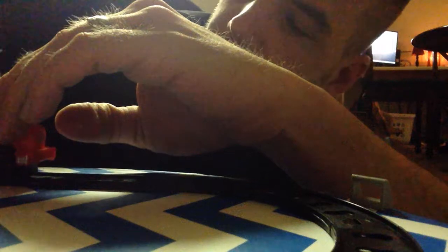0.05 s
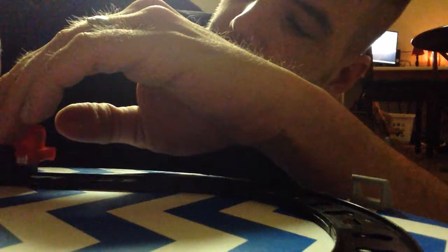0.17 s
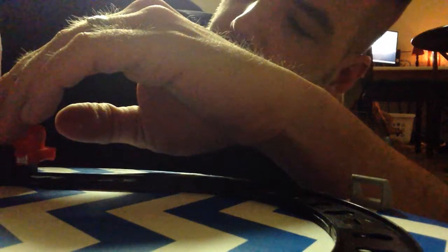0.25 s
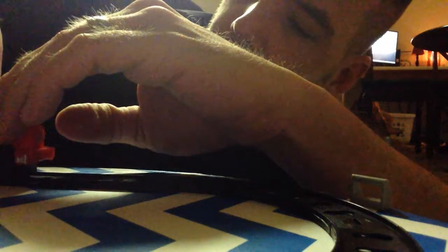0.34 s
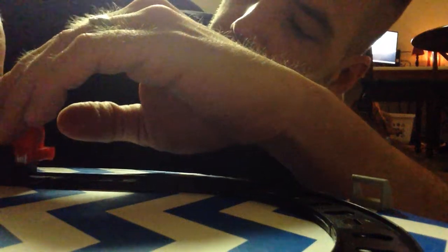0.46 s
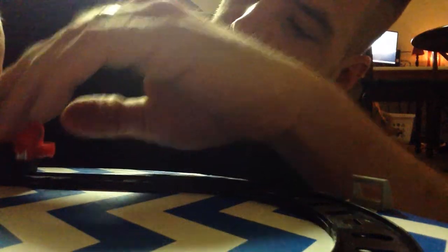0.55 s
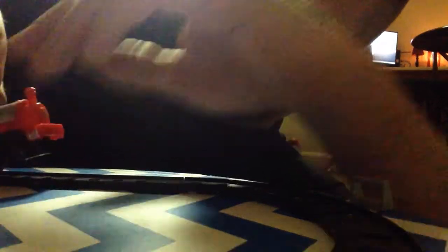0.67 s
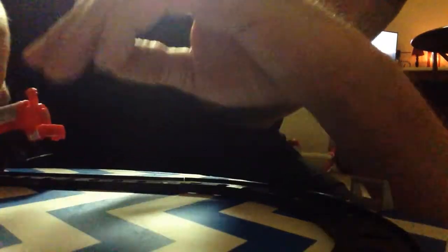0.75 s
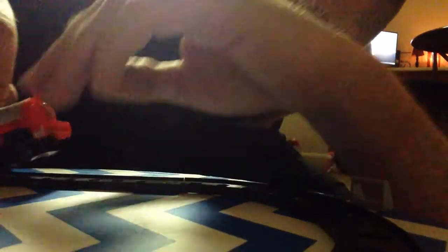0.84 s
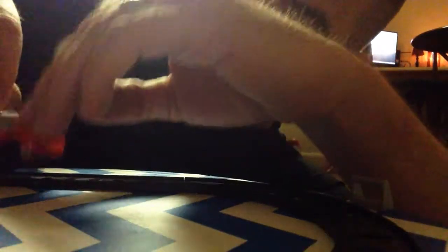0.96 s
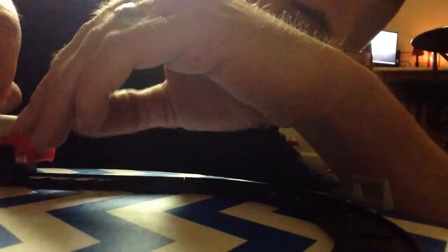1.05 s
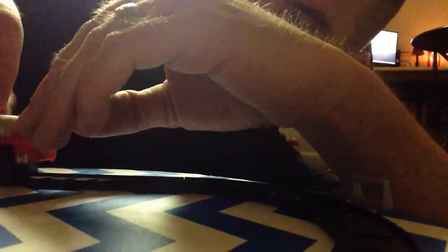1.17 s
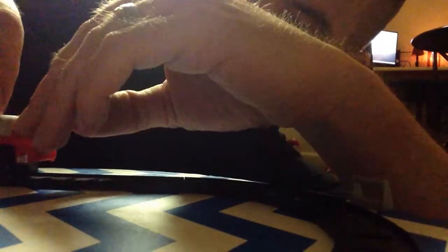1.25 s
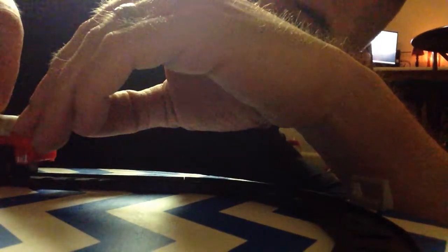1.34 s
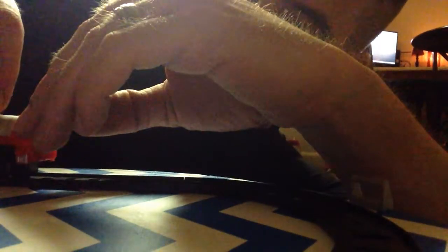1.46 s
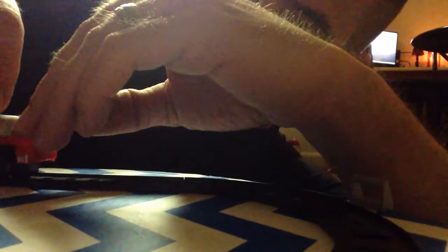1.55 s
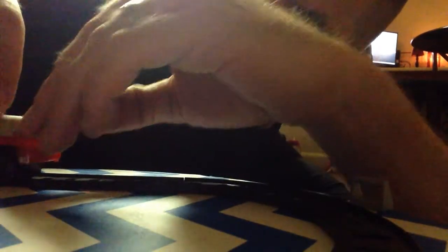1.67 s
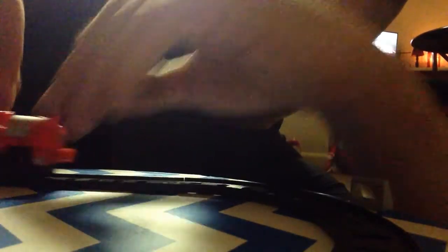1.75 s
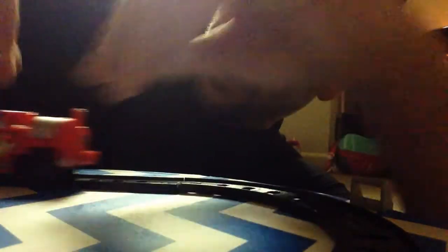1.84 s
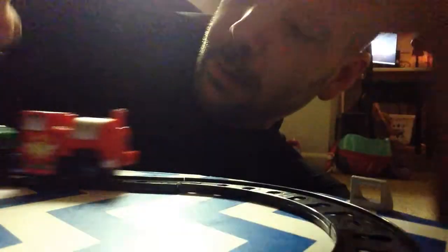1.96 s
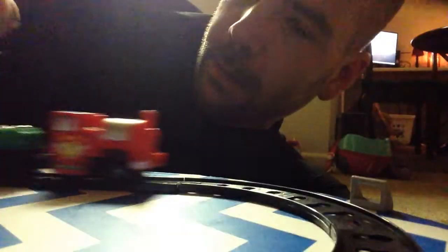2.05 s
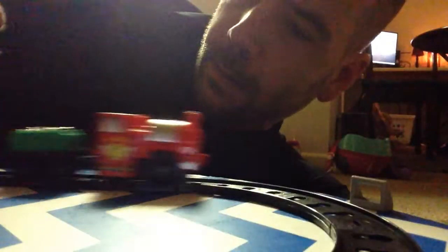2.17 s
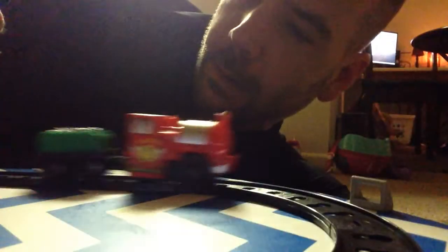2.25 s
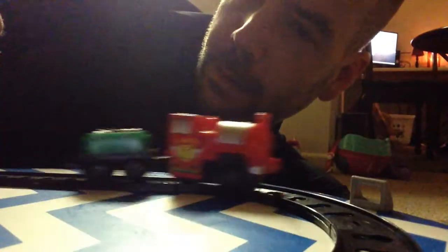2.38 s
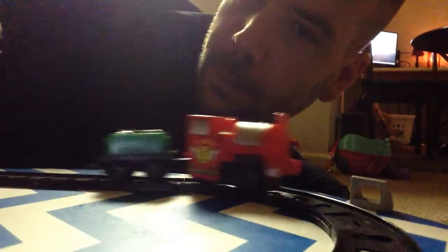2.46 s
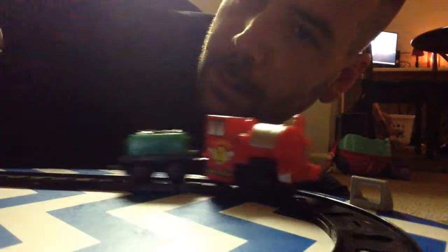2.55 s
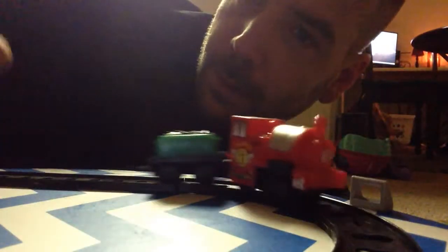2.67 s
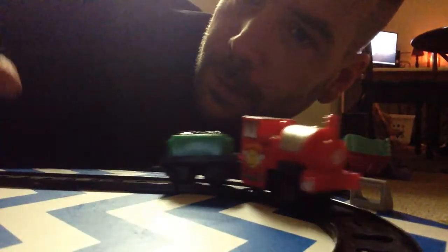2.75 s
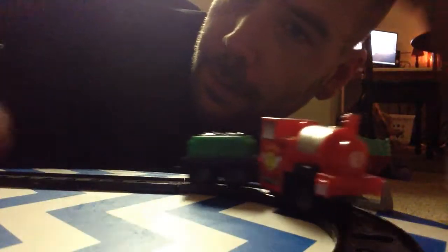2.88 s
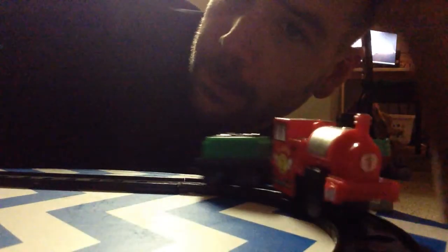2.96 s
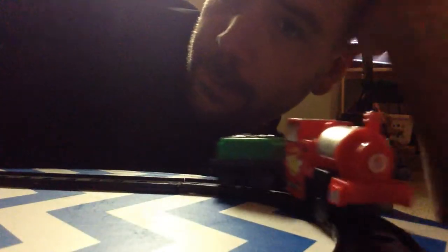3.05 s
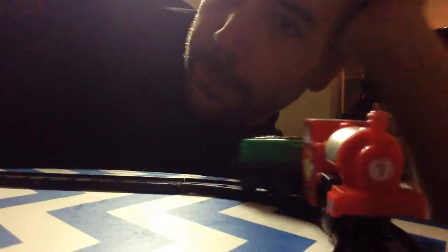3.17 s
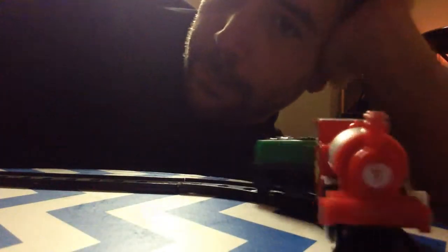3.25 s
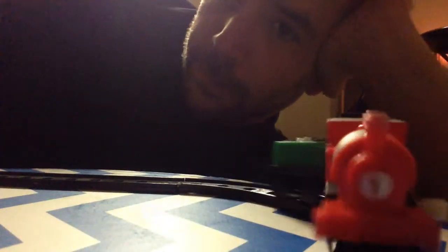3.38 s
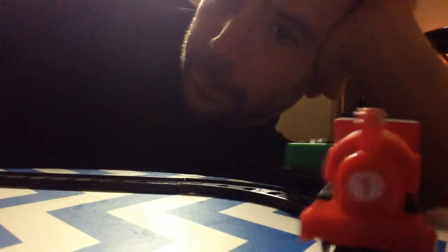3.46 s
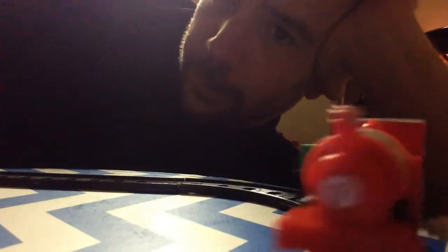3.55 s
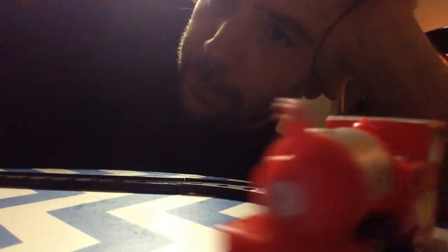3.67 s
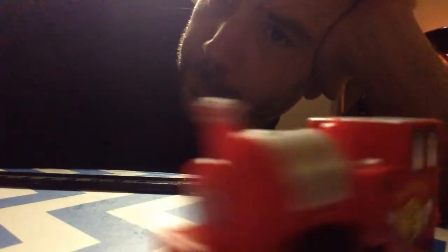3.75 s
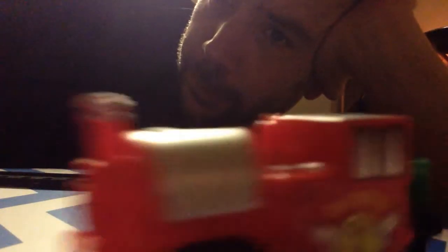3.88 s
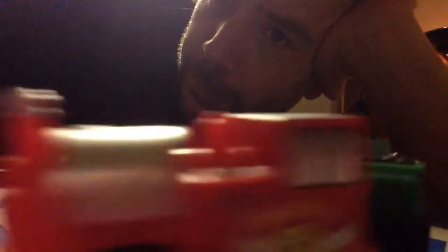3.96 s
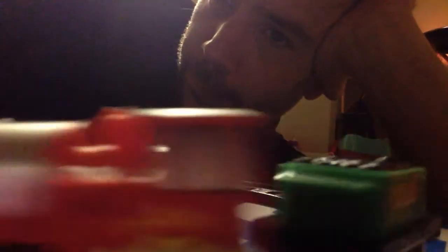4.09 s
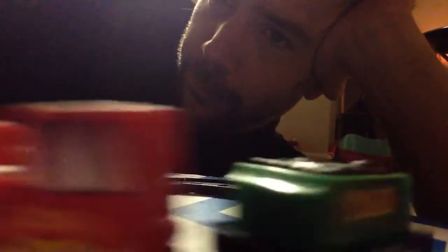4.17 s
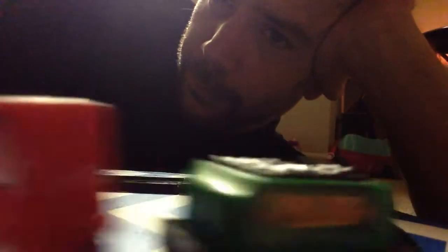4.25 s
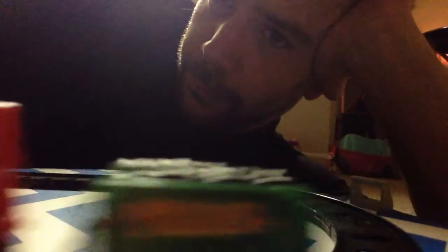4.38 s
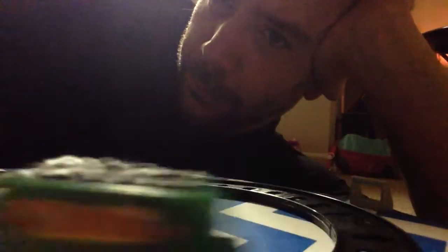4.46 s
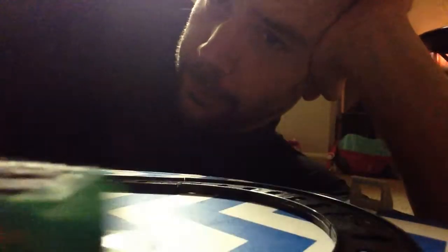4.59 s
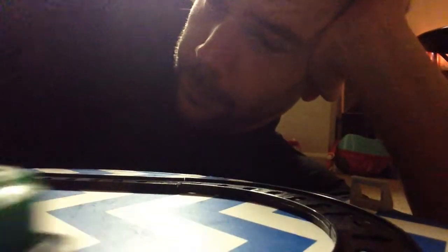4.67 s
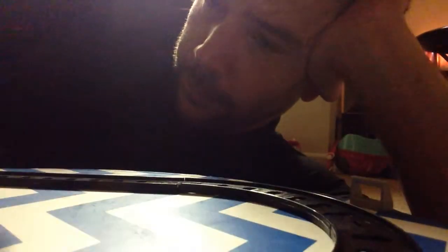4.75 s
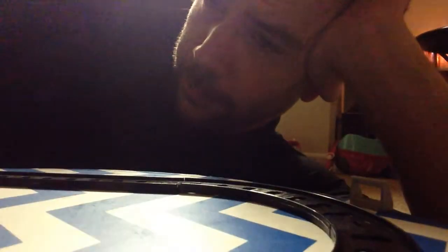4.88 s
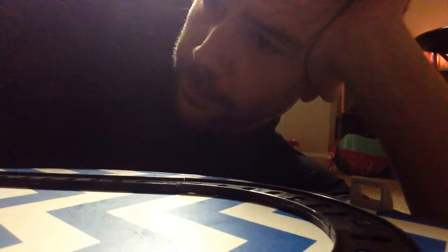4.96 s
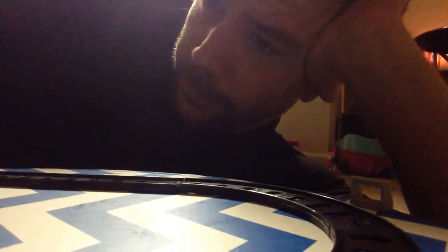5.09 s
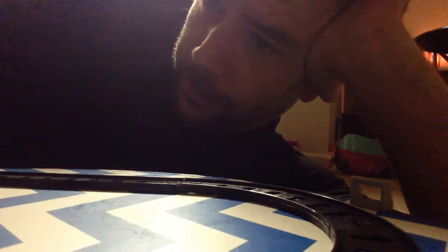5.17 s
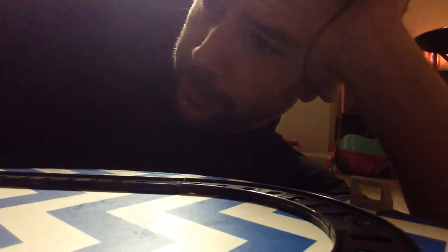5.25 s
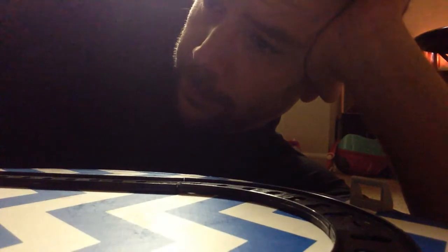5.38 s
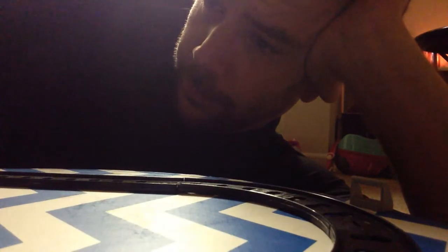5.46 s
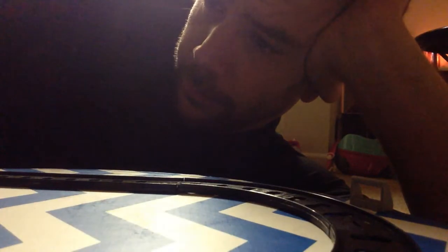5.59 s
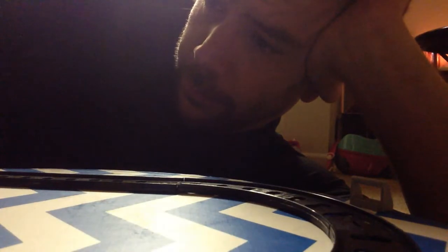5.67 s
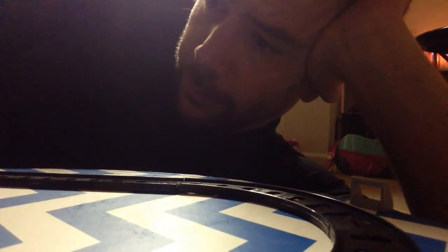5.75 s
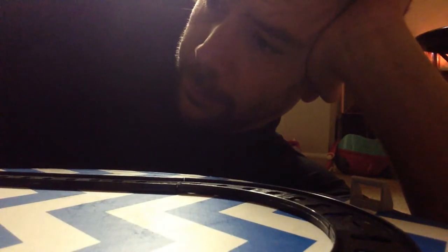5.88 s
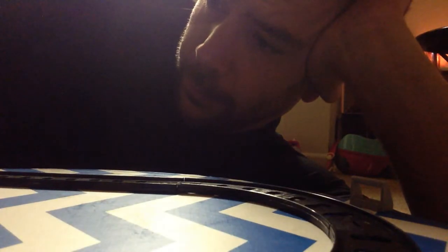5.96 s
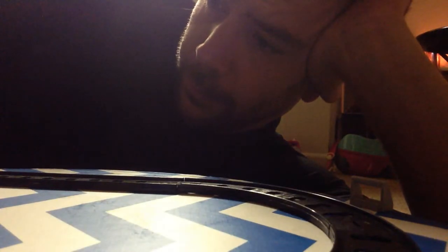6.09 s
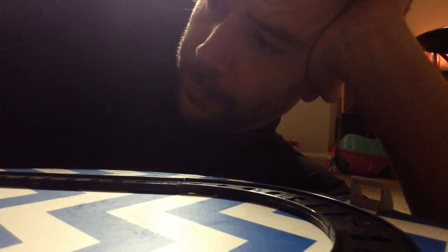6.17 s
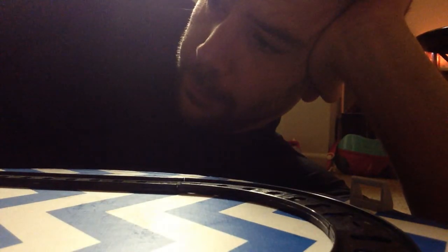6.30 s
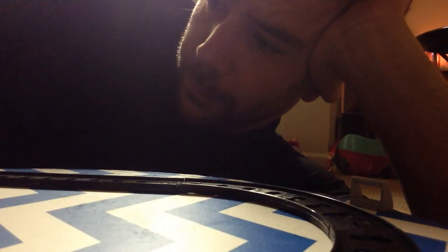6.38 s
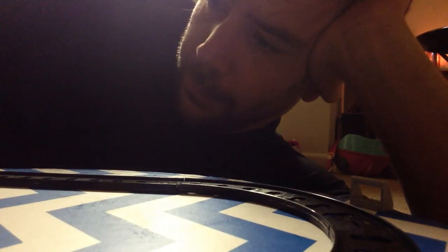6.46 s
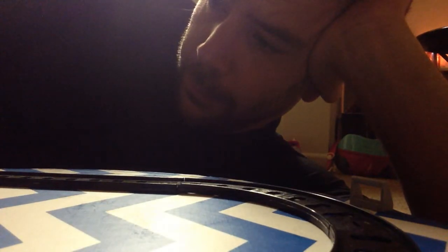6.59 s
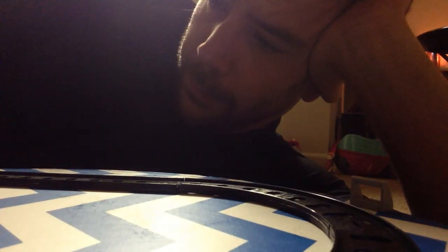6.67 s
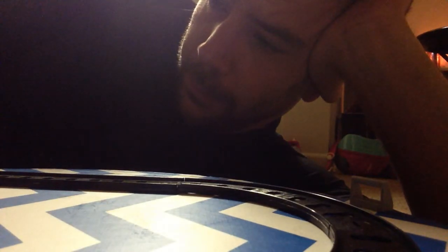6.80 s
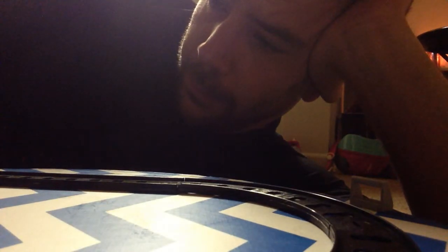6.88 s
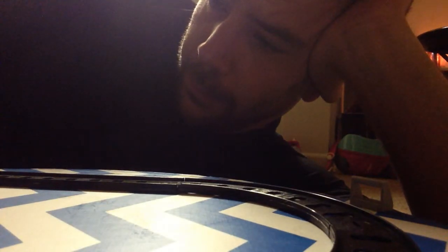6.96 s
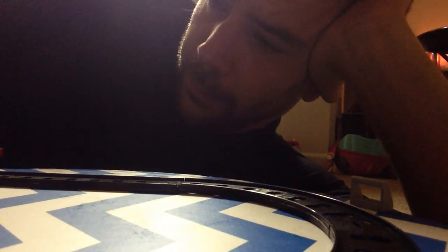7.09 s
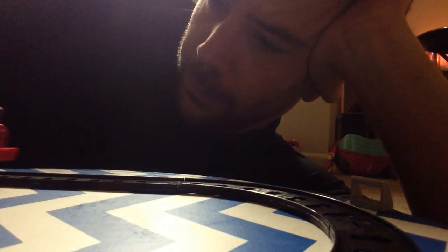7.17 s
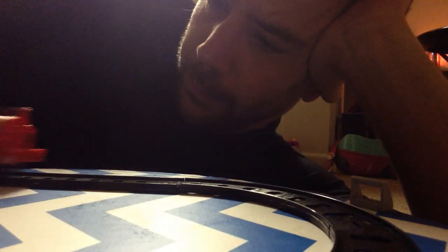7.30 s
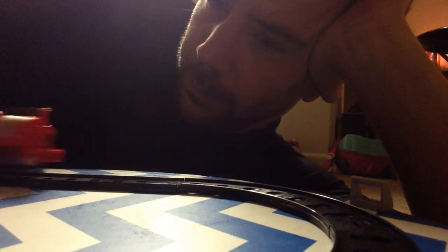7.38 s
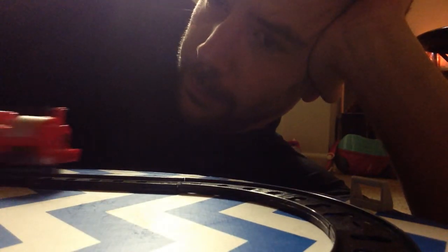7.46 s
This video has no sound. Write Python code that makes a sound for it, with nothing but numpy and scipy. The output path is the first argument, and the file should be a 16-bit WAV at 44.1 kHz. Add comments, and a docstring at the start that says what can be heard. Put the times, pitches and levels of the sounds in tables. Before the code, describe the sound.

Plastic clicks and stuttering motor bursts, then a buzzy toy train clatters one lap over a tabletop, knocking across track joints.

```python
"""Toy train lap on a tabletop track

A battery toy train on a plastic track laid on a table, heard from the edge of the track in a small room.
Fingers fumble the switch and the motor runs in short spurts; then the train does one lap, passing close by.
Bunched random tooth contacts rattle in a hollow shell whose colour changes as the train moves. Wheel taps
drum on the table and track, joints knock and boom, and loose pieces of track ring as resonances."""
import sys
import numpy as np
from scipy import signal
from scipy.fft import rfft, irfft
from scipy.io import wavfile

SR = 44100
rng = np.random.default_rng(int(sys.argv[2]) if len(sys.argv) > 2 else 0)


def wrap_up_sound(samples):
    """Save the sound to the file named by the first command line argument, as 16-bit audio."""
    columns = np.atleast_2d(samples).T
    # keep every value between -1 and 1, then stretch to whole-number steps
    tamed = np.clip(columns, -1, 1)
    steps = np.round(tamed * 32767).astype(np.int16)
    wavfile.write(sys.argv[1], SR, steps)


N = 332073
TIME = np.arange(N) / SR
START_S = 1.767   # the lap begins

# Spectrum of a wheel knock. Each row: frequency in Hz, level in dB per Hz.
KNOCK_SPECTRUM = [(20, -61), (50, -32), (100, -2.5), (170, 8), (260, 0), (400, -2), (550, -4), (900, -17.5),
                  (1600, -17), (4000, -55)]
# Spectrum of a plastic click or rub. Each row: frequency in Hz, level in dB per Hz.
CLICK_SPECTRUM = [(300, -13), (900, -2), (1600, -16.5), (2600, -4), (4000, -2), (7000, -10), (15000, -26.5)]
# Engine on the track, with the bass damped by the hand. Each row: frequency in Hz, level in dB per Hz.
SET_DOWN_SPECTRUM = [(20, -48.5), (50, -16), (100, -7), (170, 4), (280, 5), (400, -8), (550, -12),
                     (900, -17), (1600, -33), (4000, -46)]


def from_db(db):
    """Amplitude ratio of a level in dB."""
    return 10 ** (np.asarray(db) / 20)


def rms_one(x):
    """The signal scaled to an rms of 1."""
    return x / np.sqrt(np.mean(x ** 2) + 1e-20)


def in_time(rows):
    """The columns of a curve table at every sample."""
    s, *columns = np.transpose(rows)
    return [np.interp(TIME, s, column) for column in columns]


def drift(hz):
    """Smooth chance with rms 1: noise lowpassed at this frequency."""
    lowpass = signal.butter(2, hz, fs=SR, output="sos")
    slow = signal.sosfilt(lowpass, rng.standard_normal(N + SR))
    return rms_one(slow[SR:])   # leave out the filter's first second


def response(colour, size=4096):
    """The causal (minimum-phase) impulse response of a body with this spectrum; peak 1."""
    hz, db = np.transpose(colour)
    grid = np.maximum(np.arange(size // 2 + 1) * SR / size, 1)
    level_db = np.interp(np.log(grid), np.log(hz), db)
    # folding the cepstrum onto positive time gives minimum phase
    cepstrum = irfft(np.log(from_db(level_db)))
    cepstrum[1:size // 2] *= 2
    cepstrum[size // 2 + 1:] = 0
    h = irfft(np.exp(rfft(cepstrum)))
    return h / np.abs(h).max()


def through(x, h):
    """A sound passed through an impulse response, kept to its own length."""
    return signal.oaconvolve(x, h)[:len(x)]


def add(out, s, sound):
    """Mixes a short sound in at time s."""
    at = int(s * SR)
    out[at:at + len(sound)] += sound[:N - at]


def impacts(chance, spread_db):
    """Contacts of either sign and the given strength spread, with the given chance at each sample."""
    size = from_db(spread_db * np.clip(rng.standard_normal(N), -2, 2))
    return (rng.random(N) < chance) * size * rng.choice([-1, 1], N)


def ringing(t60, ring_db, size=4096):
    """A sharp contact followed by decaying noise, like the dense, dying modes of a hollow part."""
    h = rng.standard_normal(size) * from_db(-60 * np.arange(size) / SR / t60)
    h *= from_db(ring_db) / np.linalg.norm(h)
    h[0] = 1
    return h


def strike(clicks, t60, ring_db):
    """Each sharp contact is followed by a dense noisy ring that dies away and is never twice the same."""
    keep = from_db(-120 / (t60 * SR))   # energy kept from sample to sample
    energy = signal.lfilter([1 - keep], [1, -keep], clicks ** 2 + 1e-18)
    return clicks + from_db(ring_db) * np.sqrt(energy) * rng.standard_normal(N)


def blows(events, colour, t60, ring_db):
    """Single blows (time in seconds, peak in dB) on a body, each with its own ring."""
    out = np.zeros(N)
    for s, db in events:
        hit = through(ringing(t60, ring_db), response(colour))
        add(out, s, from_db(db) * hit / np.abs(hit).max())
    return out


def mode(x, hz, t60):
    """One resonance: a two-pole filter that rings down by 60 dB in t60 seconds."""
    r = from_db(-60 / (t60 * SR))
    w = 2 * np.pi * hz / SR
    return signal.lfilter([1, 0, -1], [1, -2 * r * np.cos(w), r * r], x)


def resonate(clicks, modes, wander_db, wander_hz):
    """Modes driven by the contacts; each swells and fades as the point of contact moves."""
    out = 0
    for hz, db, t60 in modes:
        drive = clicks * rng.standard_normal(N) * from_db(wander_db * drift(wander_hz))
        out = out + from_db(db) * rms_one(mode(drive, hz, t60))
    return rms_one(out)


def travelling(x, colours, times):
    """A sound whose colour passes from one spectrum to the next as the train moves."""
    out = 0
    for row, colour in zip(np.eye(len(colours)), colours):
        share = np.interp(TIME, times, row)
        out = out + share * rms_one(through(x, response(colour)))
    return out


def quiet_room():
    """The steady hush of the quiet room: noise shaped by a fixed spectrum."""
    # Spectrum of the quiet room. Each row: frequency in Hz, level in dB per Hz.
    hush = [(15, -48.5), (25, -18), (38, -8.5), (71, -4.5), (106, 2), (146, -6), (264, -11), (309, -7),
            (404, -12.5), (501, -7.5), (790, -10.5), (1120, -20.5), (1280, -18), (1390, -25), (1760, -27),
            (1910, -21.5), (2240, -33), (2500, -30), (4870, -36.5), (5280, -35), (15000, -37.5)]
    return from_db(-61.5) * rms_one(through(rng.standard_normal(N), response(hush)))


def room(x, t60):
    """The diffuse tail of a small furnished room: decaying noise after a gap of 5 ms."""
    t = TIME[:SR // 2]
    tail = rng.standard_normal(len(t)) * from_db(-60 * t / t60) * (t > .005)
    return through(x, tail / np.linalg.norm(tail))


def hand_bumps():
    """The hand bumps the table softly: short low thuds."""
    # Soft bumps of the hand. Each row: start in seconds, peak in dB.
    bumps = [(.426, -49), (.4405, -34.5), (.511, -51), (.614, -45), (1.268, -46)]
    # Spectrum of the bumped table. Each row: frequency in Hz, level in dB per Hz.
    bump_spectrum = [(20, -46), (40, -25), (90, 0), (150, -1.5), (300, -5.5), (500, -28.5), (1200, -40),
                     (3000, -68)]
    return blows(bumps, bump_spectrum, t60=0.039, ring_db=0)


def fingers():
    """Fingers rub the plastic shell: skin slips over it in fine grains."""
    # Strokes of the fingers. Each row: centre in seconds, level in dB, half width in seconds.
    rubs = [(.553, -71, 0.0026), (.595, -77, 0.041), (.623, -65, 0.0083), (0.663, -50, 0.0028),
            (1.724, -66, 0.0046), (1.742, -63, 0.0029), (1.756, -55.5, 0.0075)]
    pressure = sum(from_db(db) * np.exp(-.5 * ((TIME - s) / width) ** 2) for s, db, width in rubs)
    grains = strike(impacts(1500 / SR, spread_db=3.0), t60=.008, ring_db=-3.0)
    return pressure * rms_one(through(grains, response(CLICK_SPECTRUM)))


def plastic_clicks():
    """The switch and the plastic wheels on the rails click: sharp contacts with a short ring."""
    # Clicks of switch and wheels. Each row: start in seconds, peak in dB.
    click_events = [(0.618, -45), (0.7067, -10), (0.7195, -20), (0.7378, -12.5), (0.876, -38),
                    (0.9465, -16), (0.958, -28), (0.983, -26), (0.9925, -34), (1.0003, -20.5),
                    (1.0243, -29), (1.0795, -23.5), (1.216, -23.5), (1.7714, -30), (1.7805, -27),
                    (1.829, -26), (2.0055, -14.5), (2.858, -19.5), (3.431, -15), (3.827, -10), (4.363, -15),
                    (4.571, -17), (4.654, -28), (4.708, -18.5), (4.796, -15), (4.873, -25), (4.946, -19),
                    (4.964, -20), (5.031, -19), (5.284, -23), (5.486, -27), (5.548, -32), (5.725, -27),
                    (5.736, -30), (6.121, -26), (6.201, -33), (6.558, -27)]
    return blows(click_events, CLICK_SPECTRUM, t60=0.018, ring_db=7)


def spurt(s, rise, hold, fall):
    """Gain of one spurt: it rises by 20 dB in the rise time, holds, then falls 20 dB per fall time."""
    before = np.maximum(s - TIME, 0) / rise
    after = np.maximum(TIME - s - hold, 0) / fall
    return from_db(-20 * np.minimum(before ** 2 + after, 10))


def wheel_load(turns, swell_db, strongest_at, waver_db):
    """Level change in dB as the load swells once a wheel turn and wavers by chance."""
    return swell_db * np.cos(2 * np.pi * (turns - strongest_at)) + waver_db * drift(14.5)


def stutters():
    """Level change in dB as the gears briefly lose contact at random moments."""
    per_s, depth_db, length_s = 14, -4.5, 0.01
    moments = rng.random(N) < per_s / SR
    dips = through(moments * 1.0, np.hanning(int(length_s * SR)))
    return depth_db * np.minimum(dips, 1)


def slack():
    """Level change in dB as the gears run free, or catch hard and rattle louder for a moment."""
    # Gears going slack. Each row: centre in seconds, level change in dB, length in seconds.
    slacks = [(1.797, -7.5, 0.027), (2.308, -4.5, 0.042), (2.486, -5, 0.03), (2.629, -8.5, 0.014),
              (2.672, -6.5, 0.029), (2.817, -14, 0.017), (2.843, -5.5, 0.025), (2.884, -8, 0.019),
              (3.025, -6, 0.016), (3.18, -5.5, 0.02), (3.212, -8.5, 0.023), (3.366, -5.5, 0.029),
              (3.404, -8, 0.0097), (3.458, -6.5, 0.015), (3.567, -7, 0.014), (3.59, -3.5, 0.0081),
              (3.632, -6, 0.015), (3.769, -6.5, 0.013), (3.958, -7.5, 0.0091), (4.124, -4.5, 0.029),
              (4.163, -12, 0.0093), (4.352, -8.5, 0.011), (4.392, -2.5, 0.014), (4.545, 0, 0.012),
              (4.736, -1.5, 0.029), (5.531, -14, 0.017), (5.713, -5, 0.012), (5.756, -11, 0.022),
              (5.792, -0.5, 0.042), (5.966, -9.5, 0.017), (6.173, -9, 0.025), (6.378, -8.5, 0.024),
              (6.593, -12, 0.017), (6.746, -7, 0.013), (7.008, -5, 0.036), (7.198, -11, 0.018),
              (7.434, -2, 0.038)]
    # Gears catching hard. Each row: centre in seconds, rise in dB, length in seconds.
    catches = [(2.438, 2.5, 0.02), (4.092, 0.5, 0.022), (4.183, 4, 0.021), (4.25, 0.5, 0.06),
               (4.455, 1.5, 0.05), (4.501, 1.5, 0.025), (7.162, 6.5, 0.014), (7.37, 5.5, 0.016)]
    out = np.zeros(N)
    t = TIME[:SR // 5] - TIME[SR // 10]
    for s, db, length in [*slacks, *catches]:
        add(out, s + t[0], db / (1 + (2 * t / length) ** 4))
    return out


def motor_drive():
    """Gains of gear rattle, table rumble and track clatter: the spurts, and the lap pulsing with wheel turns."""
    # Motor spurts under the fingers. Each row: time of reaching full level in seconds, rise in seconds,
    # hold in seconds, gear level in dB, wheel level in dB.
    spurts = [(0.681, 0.021, 0.012, -32.5, -32), (0.696, 0.015, 0.0056, -20.5, -26),
              (0.876, 0.005, 0.034, -50.5, -55), (0.951, 0.034, 0.0069, -24.5, -34),
              (1.029, 0.0077, 0.038, -35, -32), (1.096, 0.0083, 0.042, -28.5, -34),
              (1.124, 0.027, 0.062, -20, -46.5), (1.191, 0.009, 0.026, -29, -34)]
    # Loudness along the lap, as the train nears and leaves and the table gives under it, before slack and load.
    # Each row: time in seconds, gear level in dB, table rumble in dB, track clatter in dB.
    lap = [(1.82, -24.5, -31, -36.5), (2.4, -17, -27.5, -34.5), (2.54, -15.5, -36.5, -37),
           (2.8, -19, -32.5, -40.5), (3.15, -21.5, -38, -41.5), (3.4, -24, -36, -39.5),
           (3.62, -18.5, -34, -41.5), (3.83, -17.5, -35.5, -37), (4.05, -16.5, -33.5, -36.5),
           (4.3, -20.5, -38.5, -35.5), (4.7, -28.5, -38, -38), (5.1, -32, -34.5, -41),
           (5.65, -31.5, -35, -43.5), (6.1, -30, -36.5, -41.5), (6.65, -31.5, -40, -45),
           (6.87, -30.5, -35.5, -43), (7.1, -31.5, -33.5, -40), (7.3, -33, -41.5, -44),
           (7.53, -31.5, -31.5, -47)]
    # Rotation of the driving wheels. Each row: time in seconds, turns made.
    wheel_turns = [(1.8, 0), (2.44, 3), (3.024, 6), (4.545, 14), (5.53, 19), (7.61, 29)]
    # Load on gears, rumble and clatter. Each holds: swell in dB, strongest part of a turn, waver in dB.
    gear_load = (1, 0.4, 0.94)
    rumble_load = (0.97, 0.22, 0.19)
    clatter_load = (1, 0.48, 0.51)
    gear_fall_s, wheel_fall_s = 0.018, 0.022   # time to fall by 20 dB
    spurt_clatter_db = -4.5   # track clatter against table rumble in a spurt

    running = np.clip((TIME - START_S) / 0.012, 0, 1) ** .5   # spins up in 12 ms
    gear_db, rumble_db, clatter_db = in_time(lap)
    turns, = in_time(wheel_turns)
    slack_db = slack()
    wheel_slack_db = 0.62 * slack_db   # the share of the slack that reaches the wheels
    gear = running * from_db(gear_db + slack_db + stutters() + wheel_load(turns, *gear_load))
    rumble = running * from_db(rumble_db + wheel_slack_db + wheel_load(turns, *rumble_load))
    clatter = running * from_db(clatter_db + wheel_slack_db + wheel_load(turns, *clatter_load))
    for s, rise, hold, spurt_db, wheel_db in spurts:
        rolling = from_db(wheel_db) * spurt(s, rise, hold, wheel_fall_s)
        gear = np.maximum(gear, from_db(spurt_db) * spurt(s, rise, hold, gear_fall_s))
        rumble = np.maximum(rumble, rolling)
        clatter = np.maximum(clatter, from_db(spurt_clatter_db) * rolling)
    return gear, rumble, clatter


def gears(shake, drive, bunching=1.9, per_s=5600, shake_db=1.1, flurry_db=2.0):
    """Loose teeth hit and bounce in a bunch at each mesh, some jump with a hard tick, and the shell rings."""
    # Small rattling resonances of the shell. Each row: frequency in Hz, level in dB, t60 in seconds.
    shell_modes = [(2640, 5, 0.0034), (3760, -3, 0.0085), (4540, -5, 0.02), (6530, 1.5, 0.0092),
                   (8540, -1.5, 0.006), (10410, 4.5, 0.01), (11870, 5, 0.0047)]
    # Shell resonances while the fingers hold it. Each row: frequency in Hz, level in dB, t60 in seconds.
    held_modes = [(3650, 1, 0.012), (4300, 0.5, 0.0095), (6460, 2.5, 0.011)]
    # Parts of the shell that ring out over a stretch of the lap. Each row: centre in seconds,
    # half width in seconds, frequency in Hz, level in dB against the rattle, t60 in seconds.
    ring_outs = [(3.55, 0.46, 3620, -20.5, 0.02), (3.7, 0.3, 3850, -16, 0.02),
                 (3.78, 0.18, 4230, -18, 0.012), (6.25, 0.35, 2690, -24, 0.021),
                 (6.08, 0.052, 4330, -20, 0.0031), (6.42, 0.16, 5980, -6, 0.002)]
    # The rattle as radiated under the hand, by each side of the engine, by the cab just after passing and
    # by the back. Each row: frequency in Hz, level in dB per Hz.
    held = [(820, -58.5), (1400, -30), (2110, -20.5), (2290, -13), (2610, -14.5), (4100, -3), (5060, -4.5),
            (6430, -6), (7180, -7.5), (8960, -7.5), (10500, -3), (12000, -4.5), (15400, -10.5)]
    flank = [(820, -48), (1400, -19), (2290, -12), (2610, -5.5), (3090, -8.5), (3450, -2.5), (4350, 1.5),
             (4760, -0.5), (6500, -2), (7180, -5.5), (8350, 0.5), (9330, -6.5), (10200, 1), (12200, 2.5),
             (15400, -7)]
    quarter = [(820, -34), (1400, -26), (1750, -26), (2070, -19.5), (2740, -13), (3120, -15.5), (3670, -9),
               (4100, -10), (4440, -8), (7040, -10.5), (8610, -3.5), (9610, -8), (12100, -2), (14800, -8),
               (15400, -3)]
    nose = [(1000, -30.5), (1700, -14.5), (2100, -14.5), (2700, -5), (3150, -8.5), (3760, -4), (4480, -8),
            (4950, -15.5), (6010, -10), (7300, -6), (8150, -2), (9620, -5), (11600, -1), (14700, -3.5),
            (15400, -4.5)]
    close = [(1000, -36), (1700, -12), (1900, -11), (2650, 2), (3100, -2), (3930, 2), (5960, 4.5),
             (7500, -5.5), (8860, 4), (9530, 2), (10400, 4.5), (12100, 3), (13800, -1), (14700, -4),
             (15400, 2.5)]
    cab = [(820, -37), (1400, -8), (1990, -8), (2160, -4.5), (2740, -1), (3060, -4), (3490, -3),
           (5480, -4.5), (7040, -3.5), (9330, -4.5), (11300, 1), (15400, -1)]
    rear = [(880, -44), (1500, -8.5), (1910, -7), (2740, -0.5), (3030, -3.5), (3610, -0.5), (5070, -6.5),
            (5480, -9.5), (6340, -3.5), (8090, -1), (9370, -2), (12000, 1.5), (12700, 3), (13800, -8),
            (15400, -12)]
    behind = [(880, -80), (1500, -13), (2130, -9.5), (2420, -5.5), (2740, -4.5), (3430, -5.5), (4050, -0.5),
              (5480, -2), (7130, -0.5), (7790, 0.5), (8670, 1.5), (9550, -2), (11100, 4.5), (12700, -0.5),
              (15400, -11)]
    # When each of those colours faces the listener. Each entry: time in seconds.
    facing_s = [1.3, 1.7, 2.1, 2.55, 3.3, 3.72, 4.05, 4.38, 4.9, 6.2]
    tooth_hz = 716.3   # mesh rate at full speed, before its random drift
    full_speed_db, speed_follows = -24, 0.6   # in a spurt, a rattle below this level turns slower; exponent
    between_meshes = 0.04   # contact chance added everywhere as teeth slide, against a mesh peak of 1
    snaps_per_s, snap_db = 70, -13.5   # hard ticks of a jumping tooth; level against the rattle

    # while the motor spins up or down in the hand, the teeth tick past one by one and less evenly
    spurt_pace = np.clip((drive / from_db(full_speed_db)) ** speed_follows, .13, 1)
    pace = np.where(TIME < START_S, spurt_pace, 1)
    speed = pace * np.exp(.2 * drift(60) / np.sqrt(pace))
    mesh = 2 * np.pi * np.cumsum(tooth_hz * speed) / SR
    # the bounces also come in flurries of a few milliseconds as the play between the gears opens and closes
    bunch = between_meshes + np.exp(bunching / pace * (np.cos(mesh) - 1))
    bunch = bunch * from_db(flurry_db * drift(280))
    chance = per_s / SR * bunch / bunch[TIME > START_S].mean()
    teeth = impacts(chance, spread_db=0.0) * from_db(shake_db * shake) / pace ** .25
    shell = rms_one(strike(teeth, t60=0.007, ring_db=0.5))
    snaps = impacts(snaps_per_s / SR * (TIME > START_S), spread_db=1.0)
    shell += from_db(snap_db) * rms_one(strike(snaps, t60=0.004, ring_db=12))
    shell += from_db(-11) * resonate(teeth, shell_modes, wander_db=4.0, wander_hz=27.0)
    shell += from_db(-11.5) * (TIME < START_S) * resonate(teeth, held_modes, wander_db=2.0, wander_hz=14)
    sides = [held, flank, flank, quarter, nose, nose, close, cab, rear, behind]
    out = travelling(shell, sides, facing_s)
    for s, width, hz, db, t60 in ring_outs:
        stretch = np.exp(-.5 * ((TIME - s) / width) ** 2)
        out += from_db(db) * stretch * resonate(teeth, [(hz, 0, t60)], wander_db=2.0, wander_hz=12)
    return out


def wheels(modes, shake, per_s, t60, shake_db, modes_db):
    """The shaking chassis taps its wheels on the rails: a dull thud and a few ringing modes."""
    taps = impacts(per_s / SR, spread_db=1.0) * from_db(shake_db * shake)
    thud = rms_one(strike(taps, t60, ring_db=-6.0))
    return thud + from_db(modes_db) * resonate(taps, modes, wander_db=3.5, wander_hz=14.0)


def table_rumble(shake):
    """The wheels drum on the table, whose colour depends on where the train is; small joints add bumps."""
    # Ringing modes of the table top. Each row: frequency in Hz, level in dB, t60 in seconds.
    table_modes = [(157.2, -4, 0.044), (257.1, -0.5, 0.076), (300.4, -4.5, 0.11)]
    # The table under the start, the near and far half of the track, and the last stretch before the start
    # comes round again. Each row: frequency in Hz, level in dB per Hz.
    table_start = [(21, -64), (35, -33), (130, -1.5), (172, -18), (227, -3), (253, -6), (360, -6.5),
                   (422, -15.5), (450, -31), (580, -38), (990, -120)]
    table_near = [(21, -58), (35, -35), (92, -0.5), (124, -4.5), (161, -0.5), (198, 0), (237, -0.5),
                  (348, -7), (400, -13), (450, -12), (580, -80), (990, -120)]
    table_far = [(21, -60), (35, -24), (57, -23), (77, -0.5), (161, 0.5), (247, 0.5), (290, -6.5),
                 (323, -4.5), (360, 0), (409, -9), (450, -1), (580, -55), (990, -120)]
    table_return = [(21, -67), (35, -24), (57, -21), (80, -2), (125, 0), (172, 2), (215, -3.5), (262, -3.5),
                    (330, -5.5), (400, -10.5), (450, -9), (580, -56), (990, -120)]
    # When the train is in the hand, then over each of those places. Each entry: time in seconds.
    over_s = [1.3, 1.7, 4.2, 4.9, 7.1]
    drumming = wheels(table_modes, shake, per_s=900, t60=0.027, shake_db=-0.5, modes_db=-16)
    places = [SET_DOWN_SPECTRUM, table_start, table_near, table_far, table_return]
    return travelling(drumming, places, over_s) + from_db(-12.5) * small_joints()


def track_clatter(shake):
    """The wheels clatter on the plastic track, which rings at its own modes."""
    # Ringing modes of the track. Each row: frequency in Hz, level in dB, t60 in seconds.
    track_modes = [(503, 0, 0.038), (556.6, -5.5, 0.14), (670, 0, 0.024), (789, -0.5, 0.027),
                   (930, -3.5, 0.013)]
    # Spectrum of the track. Each row: frequency in Hz, level in dB per Hz.
    track_spectrum = [(220, -35.5), (380, 3.5), (417, -4.5), (479, -2), (550, 1), (811, -4.5), (1190, -6),
                      (1700, -16), (2210, -38), (3740, -120)]
    tapping = wheels(track_modes, shake, per_s=800, t60=0.04, shake_db=2.0, modes_db=-10.0)
    return rms_one(through(tapping, response(track_spectrum)))


def chatters():
    """A wheel chatters on loose pieces of track: short runs of taps set each ringing at its own pitch."""
    # Runs of taps. Each row: centre in seconds, peak in dB, ring frequency in Hz, length in seconds.
    tap_runs = [(0.705, -37, 580, 0.014), (0.737, -23, 560, 0.016), (1.845, -29, 850, 0.046),
                (1.986, -25, 964, 0.011), (2.011, -24, 710, 0.015), (2.092, -29, 351, 0.019),
                (2.121, -38, 640, 0.014), (2.201, -19.5, 533, 0.014), (2.23, -24, 874, 0.023),
                (2.279, -27, 366, 0.026), (2.404, -24, 374, 0.025), (2.624, -26, 847, 0.018),
                (2.755, -23.5, 809, 0.05), (2.871, -29.5, 860, 0.0076), (2.938, -25.5, 770, 0.051),
                (3.045, -28, 670, 0.029), (3.25, -31.5, 900, 0.018), (3.314, -27.5, 680, 0.028),
                (3.494, -23.5, 587, 0.039), (3.704, -27.5, 1028, 0.035), (4.024, -25, 705, 0.023),
                (4.061, -23, 615, 0.019), (4.254, -22, 770, 0.022), (4.27, -31, 1230, 0.018),
                (4.416, -30, 1012, 0.023), (4.57, -24.5, 988, 0.0085), (4.645, -25.5, 623, .03),
                (4.718, -20, 542, 0.0034), (4.801, -21.5, 557, 0.047), (4.983, -26, 540, 0.051),
                (5.792, -31, 957, 0.014), (5.85, -31, 621, 0.046), (6.907, -36, 805, 0.011)]
    taps_per_s, ring_t60_s = 900, 0.021
    out = np.zeros(N)
    t = TIME[:SR // 5] - TIME[SR // 10]
    for s, db, hz, length in tap_runs:
        taps = (rng.random(len(t)) < taps_per_s / SR) * rng.standard_normal(len(t))
        ring = mode(taps * np.exp(-2 * (t / length) ** 2), hz, ring_t60_s)
        add(out, s + t[0], from_db(db) * ring / (np.abs(ring).max() + 1e-20))
    return out


def set_downs():
    """The hand knocks the engine against the track as it sets it down: low blows with a short ring."""
    # Knocks of the engine on the track. Each row: start in seconds, peak in dB.
    hand_knocks = [(0.708, -15.5), (0.738, -20), (0.876, -30.5), (0.952, -18), (0.979, -36), (0.994, -23.5),
                   (1.081, -18.5), (1.124, -20), (1.772, -31)]
    return blows(hand_knocks, SET_DOWN_SPECTRUM, t60=0.081, ring_db=13.5)


def small_joints():
    """Lesser bumps in the rails knock the wheels at random during the lap; rms 1."""
    per_s = 11
    drops = impacts(per_s / SR * (TIME > START_S), spread_db=1.5)
    return rms_one(through(strike(drops, t60=0.088, ring_db=1.0), response(KNOCK_SPECTRUM)))


def knocks():
    """A wheel drops over a joint: a blow, and the table top swells into a boom pitched by the place."""
    # Drops over rail joints. Each row: start in seconds, blow peak in dB, boom peak in dB,
    # boom frequency in Hz, boom swell in seconds.
    joint_drops = [(1.908, -19, -18.5, 257.2, 0.018), (1.982, -31, -21, 151, 0.0092),
                   (2.006, -23, -20, 238, 0.0043), (2.179, -20, -35, 248.8, 0.0055),
                   (2.361, -27, -20, 259, .014), (2.454, -30, -34, 108, 0.015),
                   (2.76, -24, -27, 189, 0.004), (2.922, -37, -30, 325, 0.0078),
                   (3.039, -25, -39, 245, 0.012), (3.322, -27, -25.5, 165.5, 0.01),
                   (3.439, -26, -24, 244, 0.0099), (3.716, -29, -29.5, 260, 0.0095),
                   (3.819, -22, -22, 245, 0.012), (3.99, -21.5, -28, 268, 0.0077),
                   (4.045, -40, -25.5, 336, 0.0073), (4.193, -30, -26, 287, 0.0087),
                   (4.543, -28, -24, 175, 0.0076), (4.567, -19, -24.5, 300, 0.0086),
                   (4.7138, -17.5, -24, 168.5, 0.004), (4.759, -34, -26, 177.7, 0.0067),
                   (5.032, -21.5, -17.5, 177, 0.012), (5.15, -24.5, -23.5, 200, 0.0048),
                   (5.283, -27, -24, 169.5, 0.0058), (5.362, -31, -31, 118, 0.0078),
                   (5.999, -36, -34, 237.6, 0.0083), (6.23, -32, -29, 250.4, 0.013),
                   (6.557, -38, -32, 239.9, 0.0086), (6.889, -33, -27, 173.4, 0.0047),
                   (7.156, -29, -19.5, 157, 0.0078), (7.371, -32, -27, 119.1, 0.0076),
                   (7.479, -30, -28, 208.3, 0.014)]
    out = blows([row[:2] for row in joint_drops], KNOCK_SPECTRUM, t60=0.055, ring_db=8)
    t = TIME[:SR // 6]
    for s, _, db, hz, swell in joint_drops:
        envelope = (t / swell * np.exp(1 - t / swell)) ** 2
        add(out, s, from_db(db) * envelope * np.sin(2 * np.pi * hz * t))
    return out


def scene():
    """The train, the hand that starts it and the room around them."""
    gear, rumble, clatter = motor_drive()
    shake = drift(65)   # the engine judders on its wheels
    train = hand_bumps() + fingers() + plastic_clicks()
    train += gear * gears(shake, gear)
    train += rumble * table_rumble(shake)
    train += clatter * track_clatter(shake)
    train += chatters() + set_downs() + knocks()
    return (train + from_db(-19) * room(train, t60=0.25) + quiet_room())[None]


def record(dry):
    """The highest peaks are rounded and the top is cut steeply."""
    cutoff_hz = 15350
    rounded = dry / (1 + (dry / .62) ** 6) ** (1 / 6)
    lowpass = signal.ellip(12, .1, 75, cutoff_hz, fs=SR, output="sos")
    return signal.sosfilt(lowpass, rounded)


dry = scene()
out = record(dry)
wrap_up_sound(out)
```